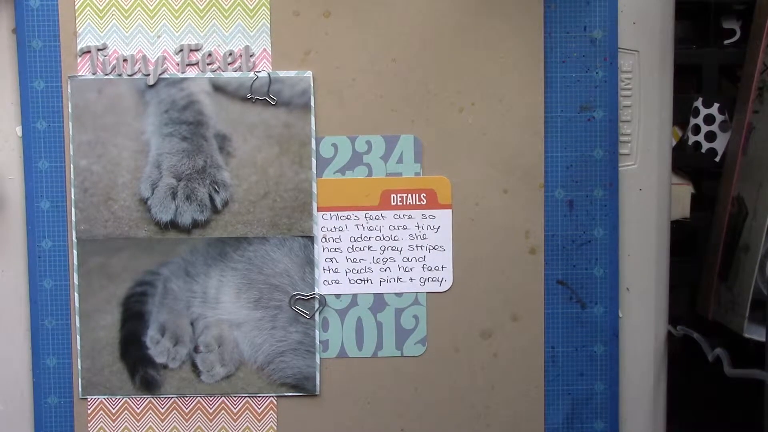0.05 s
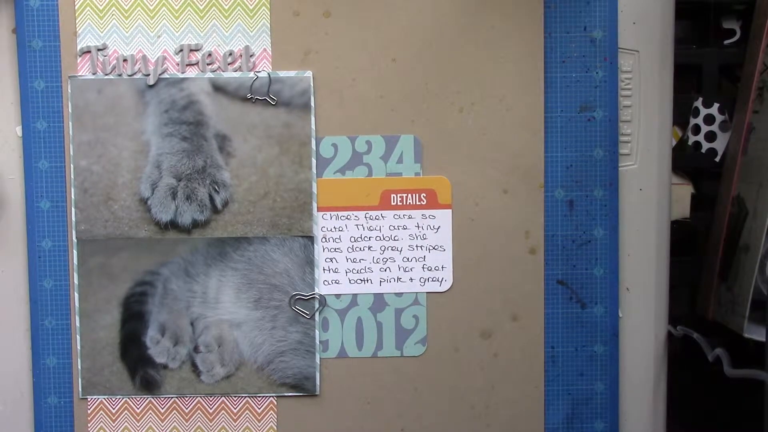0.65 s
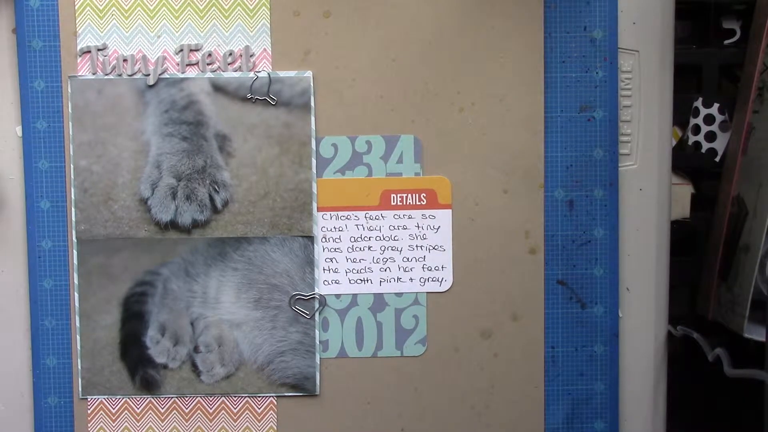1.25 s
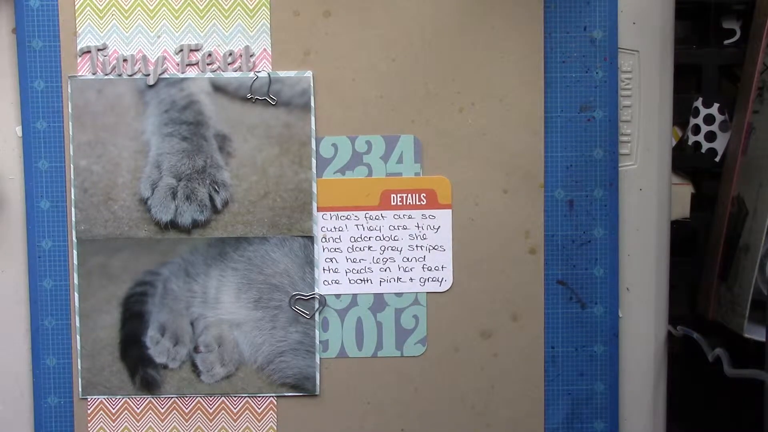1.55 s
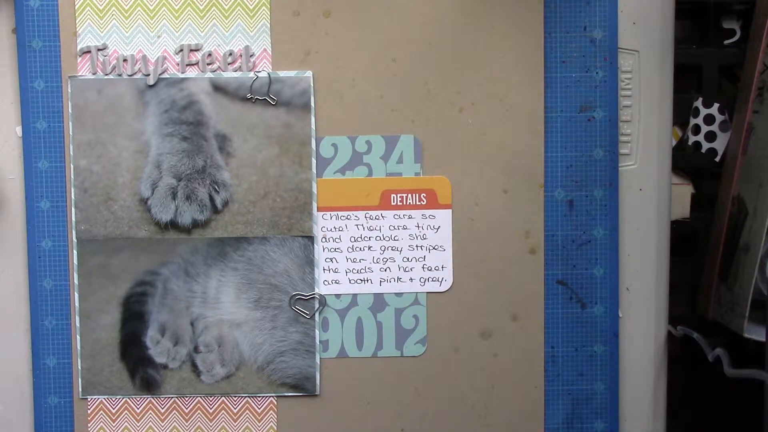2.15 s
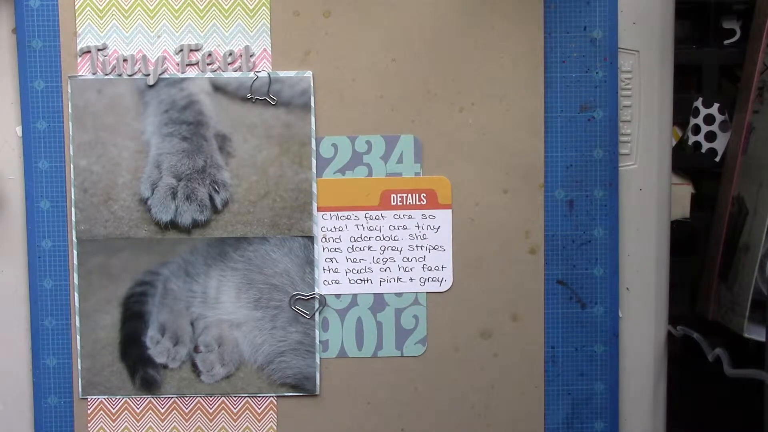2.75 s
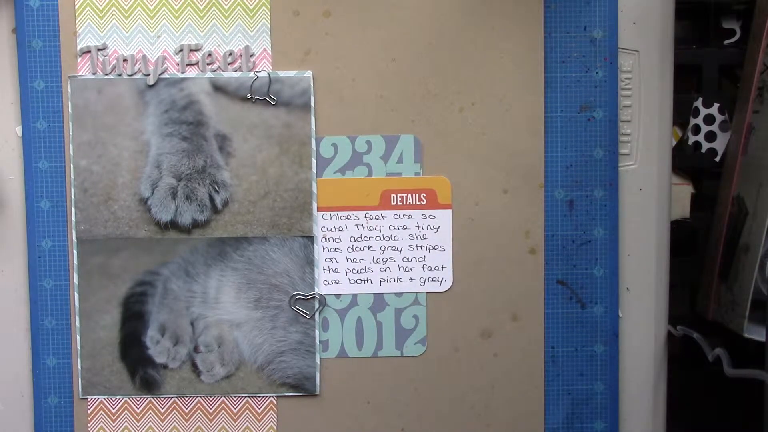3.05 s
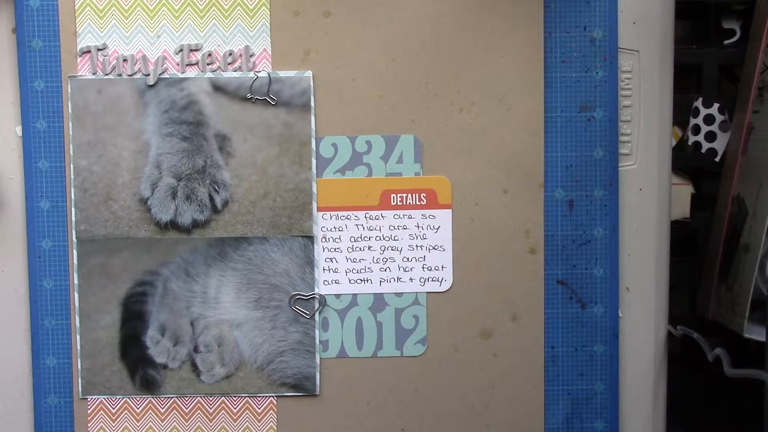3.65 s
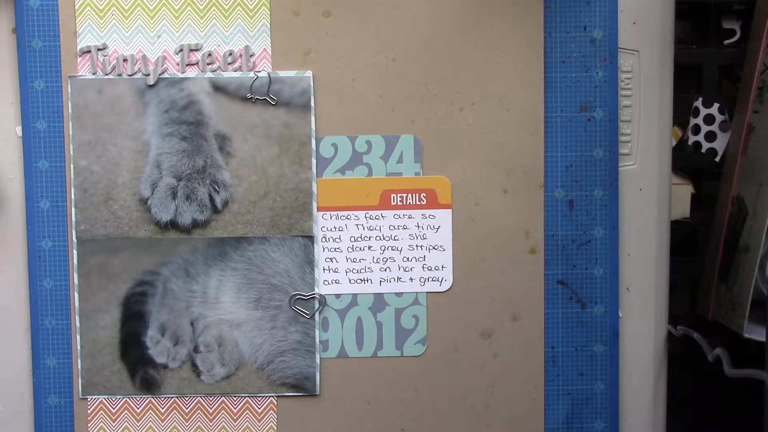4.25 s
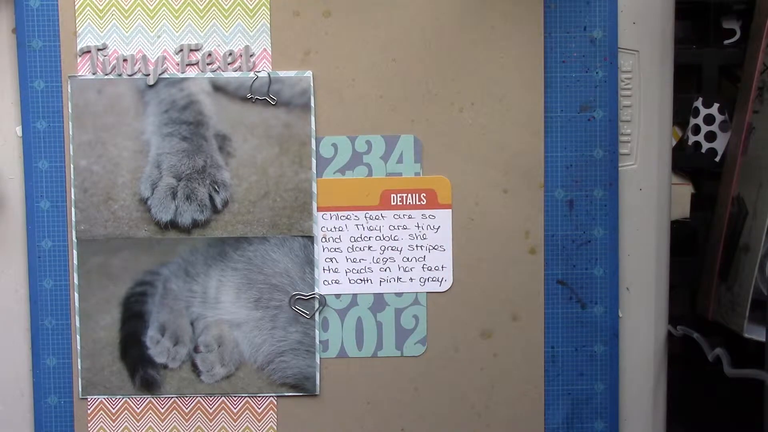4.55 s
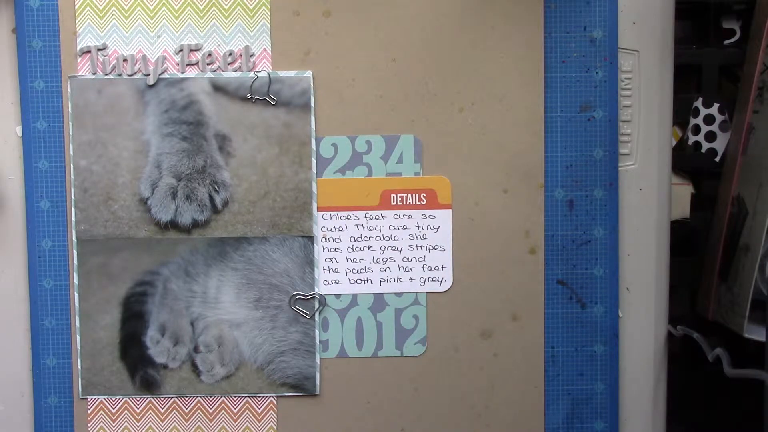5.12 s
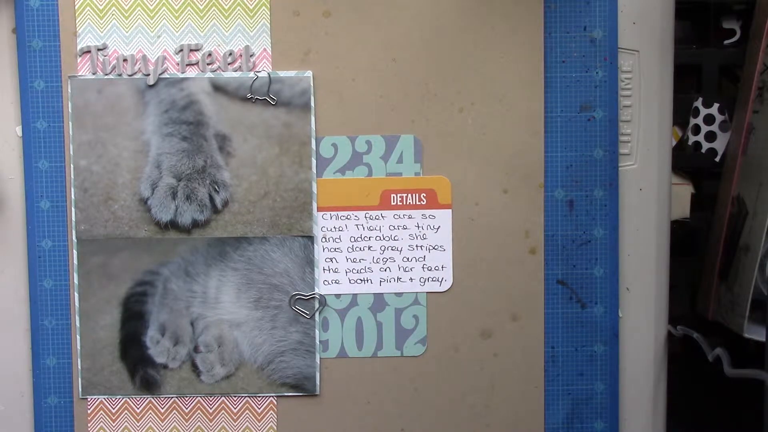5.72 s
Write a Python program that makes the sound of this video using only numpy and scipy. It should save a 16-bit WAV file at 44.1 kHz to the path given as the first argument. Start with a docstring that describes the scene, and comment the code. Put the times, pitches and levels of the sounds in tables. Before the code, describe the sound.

Someone rummages through sticker packs in a plastic bin. The sleeves rub and crinkle softly in fits and starts while card edges scrape and tap. The shuffling grows busier, then two packs snap sharply against the bin. It thins to scattered taps and a short lull, before a knock and a last brief rustle with a click. The sound is close and nearly mono, in a small quiet room with a faint hum.

```python
"""Rummaging through sticker packs

Plastic-sleeved cards shuffle in a plastic bin in a small, quiet craft room. Sleeves rub in tiny slips,
film crinkles, card edges scrape and tap, and twice a pack snaps hard against the bin. The bin's walls
and the room ring briefly, over a faint hum and room noise. The image is nearly mono."""
import sys
import numpy as np
from scipy import signal
from scipy.fft import rfft, irfft
from scipy.io import wavfile
from scipy.ndimage import uniform_filter1d

SR = 44100
rng = np.random.default_rng(int(sys.argv[2]) if len(sys.argv) > 2 else 0)


def store_wav(level_fs):
    """Save 16-bit WAV to argv[1]."""
    pcm = np.round(np.clip(np.atleast_2d(level_fs), -1, 1) * 32767)
    wavfile.write(sys.argv[1], SR, pcm.T.astype(np.int16))


N = 263945
TIME = np.arange(N) / SR


def undb(db):
    """Decibels to gain."""
    return 10 ** (np.asarray(db) / 20)


def unit(x):
    """Scale to an energy of 1."""
    return x / np.sqrt(np.sum(x ** 2) + 1e-18)


def fade(t, t60):
    """Free decay, 60 dB in t60 seconds."""
    return np.exp(-np.log(1000) * t / t60)


def add(out, s, x):
    """Mix x into out from time s."""
    i = max(int(s * SR), 0)
    out[i:i + len(x)] += x[:max(len(out) - i, 0)]


def rfft_hz(size):
    """Frequencies of the spectrum of this many samples."""
    return np.arange(size // 2 + 1) * SR / size


def slope(points, hz):
    """Read an EQ curve of (f/Hz, level/dB) points."""
    f, db = np.transpose(points)
    return np.interp(np.log(hz + 1), np.log(f), db)


def envelope(points, t=TIME):
    """Gain along a curve of (t/s, level/dB) points."""
    return undb(np.interp(t, *np.transpose(points)))


def walk(rate, size):
    """Random wandering with a spread near 1 and `rate` turns a second."""
    return np.interp(np.arange(size) * rate / SR, np.arange(size), rng.standard_normal(size))


def noise(points):
    """Steady noise coloured by an EQ curve, rms 1."""
    spectrum = rfft(rng.standard_normal(N)) * undb(slope(points, rfft_hz(N)))
    return unit(irfft(spectrum, N)) * np.sqrt(N)


def whiten(x, span=164):
    """Flatten a burst's spectrum, keeping detail finer than `span` frequency bins."""
    spectrum = rfft(x, 2 * len(x))
    power = uniform_filter1d(abs(spectrum) ** 2, span)
    return unit(irfft(spectrum / np.sqrt(power + 1e-12))[:len(x)])


def slips(size, rate, spread_db, hiss):
    """Friction: `rate` slips a second, of unequal size, over a smooth hiss; rms 1."""
    strength = undb(spread_db * np.minimum(rng.exponential(size=size), 4))
    grains = (rng.random(size) < rate / SR) * strength * rng.standard_normal(size)
    return unit(unit(grains) + hiss * unit(rng.standard_normal(size))) * np.sqrt(size)


def card(push, thud_db, edge_hz, treble_db, note_hz, note_db, note_width=0.16, size=2048):
    """A pack's response: heavy contact adds thud, soft contact loses treble, one broad note sings."""
    # colour of card in a plastic sleeve: f/Hz, level/dB
    card_colour = [(40, -44), (100, -21.5), (250, -15.5), (345, -3), (560, -3), (820, 0), (1130, -4.5),
                   (1600, -1.5), (2500, -5), (3500, -4.5), (5000, -8.5), (6500, -9.5), (11000, -21.5),
                   (15500, -37.5)]
    hz = rfft_hz(size)
    thud = thud_db / (1 + (hz / 800) ** 3)
    treble = treble_db / (1 + (edge_hz / (hz + 1)) ** 5)
    note = note_db / (1 + ((hz / note_hz - 1) / note_width) ** 2)
    db = slope(card_colour, hz) + thud + treble + note
    # folding the cepstrum makes the response start at the contact and ring afterwards
    cepstrum = irfft(db * np.log(10) / 20)
    cepstrum[1:size // 2] *= 2
    cepstrum[size // 2 + 1:] = 0
    return signal.fftconvolve(push, irfft(np.exp(rfft(cepstrum))))


def room_tone(air_db=-57, side_db=-63, whine_db=-83):
    """The bed: room noise, a wavering low hum and a thin high hiss."""
    # room noise in the centre, and the part that differs between the ears: f/Hz, level/dB
    air_colour = [(15, -42), (25, -32.5), (77, -14), (101, -9.5), (116, -5.5), (136, -5), (198, -5.5),
                  (267, -3), (349, -9), (457, -5.5), (648, -10.5), (703, -6.5), (1380, -12.5),
                  (1800, -15.5), (15500, -36)]
    side_colour = [(25, -13), (45, -17), (75, -8.5), (105, -5), (135, 0.5), (400, -0.5), (1000, -9),
                   (4000, -20), (11000, -35), (16000, -45.5)]
    # hum partials before the swell: f/Hz, level/dB
    hum_partials = [(43.5, -82.5), (74.5, -78.5), (134, -73)]
    # the hum swells and sinks: t/s, gain/dB
    hum_swell = [(0, 1.5), (2.5, 1.5), (3.3, 8), (4.1, 3.5), (5.99, -1.5)]
    air = noise(air_colour) * undb(air_db + 0.53 * walk(18, N))
    side = noise(side_colour) * undb(side_db)
    hum = np.zeros(N)
    for hz, db in hum_partials:
        amplitude = np.sqrt(2) * undb(db + 2 * walk(6.2, N))
        hum += amplitude * np.sin(2 * np.pi * hz * TIME + .6 * walk(4, N))
    whine = noise([(9500, -55.5), (10700, -15), (11100, 0), (11500, -16.5), (13000, -51)])
    return air + undb(whine_db) * whine + hum * envelope(hum_swell) + side * np.array([[1], [-1]])


def sleeve_rubs(build=0.65, release=1.3, edge_hz=3640):
    """A sleeve gathers speed, slips along its neighbour and stops."""
    # rubs: fastest at t/s, rise/s, fall/s, level/dB, thud/dB, treble/dB,
    # ringing note of the contact f/Hz (card, or the bin's low ring near 342 Hz)
    strokes = [(0.013, .012, 0.026, -33.5, 8.5, -6.5, 1180), (0.072, 0.0057, 0.067, -39.5, 3, 6, 1070),
               (0.2, 0.057, 0.098, -40, 9, 0.5, 350), (0.319, 0.053, 0.063, -57, 23, 0, 390),
               (0.491, 0.069, 0.043, -34.5, 3, -2, 560), (0.669, 0.034, 0.08, -42.5, 1, -1, 8300),
               (0.765, 0.019, 0.11, -39, 8, -7, 710), (0.9, 0.047, 0.042, -42, -5, -5, 840),
               (1.115, 0.04, 0.061, -55.5, 4, 10, 8200), (1.58, .05, 0.03, -34, -25, -3, 2840),
               (1.699, 0.035, 0.022, -36, 8.5, -14, 1760), (1.81, 0.035, 0.24, -40, 7, 1, 1630),
               (1.878, .013, 0.034, -34.5, 8, 12, 345), (1.98, 0.046, 0.068, -19.5, -1, -21, 800),
               (2.055, .035, 0.53, -33, 2, -6.5, 790), (2.195, 0.026, 0.022, -35, 1, -35, 776),
               (2.307, 0.034, 0.011, -30.5, 6.5, -7.5, 810), (2.405, .014, 0.058, -32, 6, -4.5, 1550),
               (2.55, 0.11, 0.14, -38, -14, 1, 340), (2.98, 0.0087, 0.085, -46, 17.5, 1, 880),
               (3.045, .027, 0.036, -37, 7, -27, 810), (3.24, 0.051, 0.032, -37, 5.5, -28, 790),
               (3.38, .012, 0.067, -41.5, 10.5, 10, 3800), (3.86, 0.037, 0.034, -48, -11, -1, 1700),
               (4.53, 0.046, 0.055, -47, 3, -7, 812), (4.89, 0.1, 0.073, -49, 10, 7, 770),
               (5.415, .025, 0.043, -37.5, 4.5, -5.5, 590), (5.82, .035, 0.084, -32.5, 0.5, 5.5, 2760),
               (5.885, 0.0098, 0.039, -27.5, 7, -8, 1750), (5.967, 0.07, 0.15, -37.5, -11, 3.5, 2100)]
    # a light touch lets the note sing, a firm one damps it: rub level/dB, note boost/dB
    note_damping = [(-67, 11.5), (-44.5, 7.5), (-25, 3.5)]
    out = np.zeros(N)
    for s, rise, fall, db, thud_db, treble_db, note_hz in strokes:
        t = np.arange(int((rise + fall) * SR)) / SR
        speed = np.minimum((t / rise) ** build, np.clip((rise + fall - t) / fall, 0, 1) ** release)
        friction = slips(len(t), rate=3000, spread_db=1.5, hiss=0.91) * undb(1.424 * walk(160, len(t)))
        note_db = np.interp(db, *np.transpose(note_damping))
        rub = card(speed * friction, thud_db, edge_hz, treble_db, note_hz, note_db)
        add(out, s - rise, undb(db) * rub)
    return out


def card_shuffle(gain_db=-4, stick_db=-60):
    """The hand stirs the packs in fits and starts; with effort below stick_db they stick silently."""
    # effort of the hand: t/s, level/dB
    hand_effort = [(0, -43), (0.3, -62.5), (1.08, -52.5), (1.37, -53.5), (1.62, -57.5), (1.85, -45.5),
                   (2.0, -41.5), (2.22, -70), (2.35, -48.5), (2.8, -52), (3.6, -66), (4.04, -58),
                   (4.6, -59), (4.91, -49), (5.1, -56.5), (5.65, -58.5), (5.95, -50)]
    motion = np.sqrt(np.maximum(envelope(hand_effort) ** 2 - undb(stick_db) ** 2, 0))
    rustle = noise([(60, -37), (200, -1), (340, 9), (800, -3), (1150, -7.5), (1700, -1),
                    (3500, -7.5), (8000, -29.5)])
    return undb(gain_db) * motion * rustle * undb(2.56 * walk(45, N))


def film_crinkle(flutter_db=-1.5, drift_db=0.5, ticks_per_s=14, tick_db=-9):
    """Three patches of film buckle, each at its own pitch, fluttering independently; creases pop."""
    # the crinkle peaks as the hand digs, then all but stops: t/s, level/dB
    crinkle_levels = [(0, -62.5), (1.4, -63.5), (1.65, -65), (1.85, -56), (2.1, -52.5), (2.23, -69.5),
                      (2.6, -69.5), (2.9, -72), (5.99, -79)]
    film = np.zeros(N)
    for hz in (3500, 7300, 8500):
        buckles = slips(N, rate=460, spread_db=0.5, hiss=1.0)
        buckles *= undb(flutter_db * walk(28, N) + drift_db * walk(3.7, N))
        film += unit(card(buckles, thud_db=-16, edge_hz=4200, treble_db=8.2, note_hz=hz, note_db=6.5)[:N])
    pops = (rng.random(N) < ticks_per_s / SR) * (2 * rng.random(N) - 1)
    ticks = card(pops, thud_db=-3, edge_hz=5500, treble_db=12.5, note_hz=9000, note_db=3.5)[:N]
    return envelope(crinkle_levels) * (unit(film) + undb(tick_db) * unit(ticks)) * np.sqrt(N)


def pack_knocks(edge_hz=4920, crack_hz=4000, crack_share=0.42, rise_s=.0004, size=6000):
    """Each blow makes the stacked cards chatter; returns that and the push it gives bin and room."""
    # packs hit each other and the bin: t/s, chatter t60/s, level/dB, thud/dB, treble/dB,
    # ringing note of the contact f/Hz (card, or the bin's low ring near 342 Hz), note boost/dB
    blows = [(0.202, 0.071, -5.5, -16, -14, 2490, 7.5), (0.277, 0.035, -21, 27.5, -6, 391, 9),
             (0.361, 0.081, 5, -13.5, -19.5, 1600, -2), (0.508, 0.12, -1, 8, -29, 372, 6),
             (0.7244, 0.077, -1, -5, -8, 1610, 6.5), (0.729, .035, -1, -6, -5, 3680, 2.5),
             (0.738, .03, -13.5, 3, 10, 610, -1), (0.883, 0.03, -8.5, 11.5, -29, 860, 3),
             (0.988, .07, -11, 4.5, -30, 960, 5), (1.166, 0.15, -6.5, 9, -26, 1690, 6),
             (1.552, 0.039, -2.5, -47, -9, 2850, 8), (1.591, .033, -10, -5, -7, 1860, 9.5),
             (1.64, .09, -10.5, 7, -35, 1600, 8), (1.775, 0.13, -4.5, 7, -30, 1700, 11),
             (1.784, 0.078, 7.5, -19, -19.5, 2200, 5.5), (1.824, 0.16, 4, 6.5, -5, 1530, 7.5),
             (1.949, 0.17, -6, 12.5, 2, 596, 18), (1.978, 0.12, 13.5, -8, -19, 2560, 6.5),
             (2.018, 0.078, 2, 6, -5, 446, 11), (2.085, 0.18, 3.5, 2.5, -43, 1540, 8.5),
             (2.127, 0.12, 2, 5, -18, 1670, 5), (2.234, .032, -11, 5, 19.5, 6170, 0.5),
             (2.262, 0.099, -11.5, -14, 7, 11000, 9), (2.3121, 0.17, 21.5, -6, -1.5, 342, 8),
             (2.3122, .012, 5.5, -16, 8, 12700, 10), (2.411, .07, 3.5, -1.5, -22, 2000, 5),
             (2.6633, 0.031, -12, -16, -1.5, 2180, 8), (2.7575, 0.037, 22, -2.5, 5, 1600, 5),
             (2.973, .07, -19.5, 11, -17, 880, 9), (3.005, 0.027, -14, -6, -1.5, 3900, 2),
             (3.03, 0.061, -9, 8, -17, 800, 0), (3.223, 0.11, -11, 11, -24, 785, -6),
             (3.285, 0.083, -10.5, -5, -29, 1750, 7), (3.314, 0.14, -16, 15.5, -4, 1340, 11),
             (3.52, 0.25, -0.5, -4, -14, 855, 2.5), (3.618, 0.025, -6.5, -24, -0.5, 7000, 11.5),
             (3.652, 0.13, -7.5, -5, -14, 1940, 3.5), (4.726, 0.037, -12.5, -3, -22.5, 2250, 14),
             (4.823, .036, -17.5, 3, 4, 1710, 7), (4.868, .015, -21, 5, 9.5, 6500, 8),
             (4.9184, 0.08, 12, -5.5, -11.5, 342, 1.5), (5.113, 0.043, -22, 8, 5.5, 680, 3),
             (5.3, 0.093, -5.5, -16, -4.5, 612, 17), (5.424, 0.036, -14.5, 3, 3.5, 2230, 7),
             (5.464, .033, -14.5, -16, -8.5, 510, 4), (5.8521, 0.023, -1, 2.5, -12, 1860, 18),
             (5.8675, 0.066, 14.5, -9, -4, 1880, 8.5)]
    direct, push = np.zeros(N), np.zeros(N)
    t = np.arange(size) / SR
    attack = 1 - np.exp(-t / rise_s)
    lowpass = signal.butter(2, crack_hz, fs=SR, output="sos")
    for s, t60, db, thud_db, treble_db, note_hz, note_db in blows:
        response = undb(db) * card([1], thud_db, edge_hz, treble_db, note_hz, note_db)
        contacts = rng.standard_normal(size)
        body = signal.sosfiltfilt(lowpass, contacts)
        # the first contact is the hardest, so the treble dies before the body
        chatter = body * fade(t, t60) + (contacts - body) * fade(t, crack_share * t60)
        add(direct, s - rise_s, signal.fftconvolve(whiten(chatter * attack), response))
        send_db = np.interp(db, [0, 20], [-2.5, -2])  # hard blows pass on a little more
        add(push, s, undb(send_db) * response)
    return direct, push


def scrape(stroke, modes):
    """A card edge sticks and slips, and the slips ring the sheet's resonances."""
    start, end = stroke[0][0], stroke[-1][0]
    t = np.arange(int(start * SR), int(end * SR)) / SR
    friction = slips(len(t), rate=2800, spread_db=2.5, hiss=0.99) * undb(1.2 * walk(247, len(t)))
    hz = rfft_hz(len(t))
    sheet_power = sum(undb(2 * db) / (1 + (2 * (hz - f) / width) ** 2) ** 1.3 for f, width, db in modes)
    rasp = unit(irfft(rfft(friction) * np.sqrt(sheet_power), len(t))) * np.sqrt(len(t))
    out = np.zeros(N)
    add(out, start, rasp * envelope(stroke, t))
    return out


def pack_draw():
    """A stiff pack is drawn out along its neighbour in a swelling scrape."""
    # the pull: t/s, level/dB
    stroke = [(1.17, -59.5), (1.275, -57), (1.3, -42), (1.336, -30.5), (1.345, -42), (1.351, -69)]
    # the pack's resonances: f/Hz, width/Hz, level/dB
    pack_modes = [(1670, 340, -3.5), (2070, 230, -4), (2710, 480, -3), (3110, 200, 2.5), (3580, 300, -2.5),
                  (4720, 710, -9), (6200, 1000, -13.5), (8040, 1600, -24)]
    return scrape(stroke, pack_modes)


def edge_drag():
    """A card edge bites, then drags to a stop."""
    # the drag: t/s, level/dB
    stroke = [(4.722, -71), (4.726, -44.5), (4.8, -50), (4.86, -59.5), (4.915, -61)]
    # the card's resonances: f/Hz, width/Hz, level/dB
    card_modes = [(320, 220, -11), (726, 104, 2), (1224, 100, -0.5), (1480, 100, -6), (2260, 200, 0),
                  (3095, 87, -0.5), (4650, 150, -10.5), (6000, 2200, -23.5)]
    return scrape(stroke, card_modes)


def bin_ring(push, ring_db=-17, size=16000):
    """Every contact also sets the walls of the bin ringing."""
    # modes of the bin: f/Hz, level/dB, t60/s
    wall_modes = [(342.4, 3.5, 0.24), (596.8, 8.5, .16), (694, -6.5, 0.13), (835, 6.5, 0.1335),
                  (967, 8, 0.12), (1230, -9.5, .12), (1420, -5.5, 0.17), (1495, 3, 0.12), (1662, 5, 0.13),
                  (1959, 1.5, 0.11), (2126, 1, .1), (4405, -8.5, .08)]
    t = np.arange(size) / SR
    ring = sum(undb(db) * unit(np.cos(2 * np.pi * hz * t) * fade(t, t60)) for hz, db, t60 in wall_modes)
    return undb(ring_db) * signal.fftconvolve(push, unit(ring))[:N]


def room(x, early_db=-10, tail_db=-6.5, side_db=-14, size=20000):
    """Close echoes from desk and shelves, then a short tail; left and right differ a little."""
    bands_hz, t60s = (400, 3500, 12000), (0.28, 0.29, 0.23)
    t = np.arange(size) / SR
    hz = rfft_hz(size)
    responses = []
    for _ in range(2):
        diffuse = rfft(rng.standard_normal(size))
        bands = [irfft(diffuse * np.interp(hz, bands_hz, share), size) for share in np.eye(3)]
        tail = sum(band * fade(t, t60) for band, t60 in zip(bands, t60s))
        tail *= np.clip((t - .004) / .008, 0, 1)
        early = slips(size, rate=1500, spread_db=6, hiss=0.28) * (t > .003) * fade(t, 0.065)
        responses.append(undb(early_db) * whiten(early, span=324) + undb(tail_db) * unit(tail))
    mid, side = (signal.fftconvolve(x, response)[:N] for response in responses)
    return mid + undb(side_db) * side * np.array([[1], [-1]])


def scene(sliding_send_db=-2):
    """The packs are heard directly, through the bin's walls and off the room."""
    sliding = sleeve_rubs() + card_shuffle() + film_crinkle() + pack_draw() + edge_drag()
    knocks, push = pack_knocks()
    drive = undb(sliding_send_db) * sliding + push
    return sliding + knocks + bin_ring(drive) + room(drive) + room_tone()


def record(dry):
    """Soft-clip the very highest peaks and cut the top."""
    ceiling, top_hz = .9, 15900
    rounded = dry / (1 + (dry / ceiling) ** 6) ** (1 / 6)
    return signal.sosfilt(signal.ellip(10, .2, 80, top_hz, fs=SR, output="sos"), rounded)


dry = scene()
out = record(dry)
store_wav(out)
```